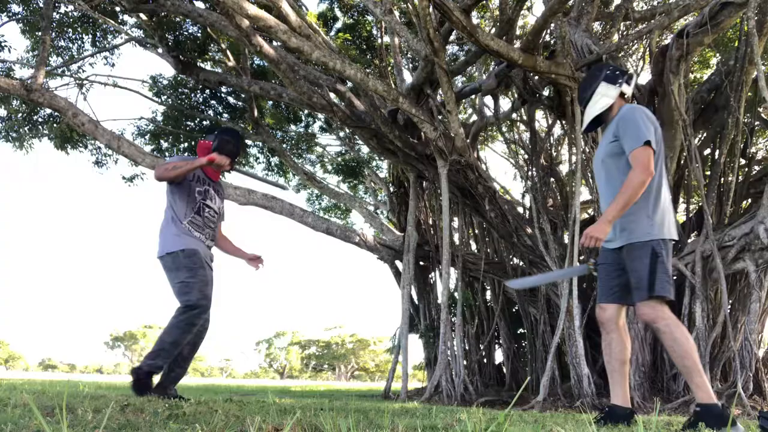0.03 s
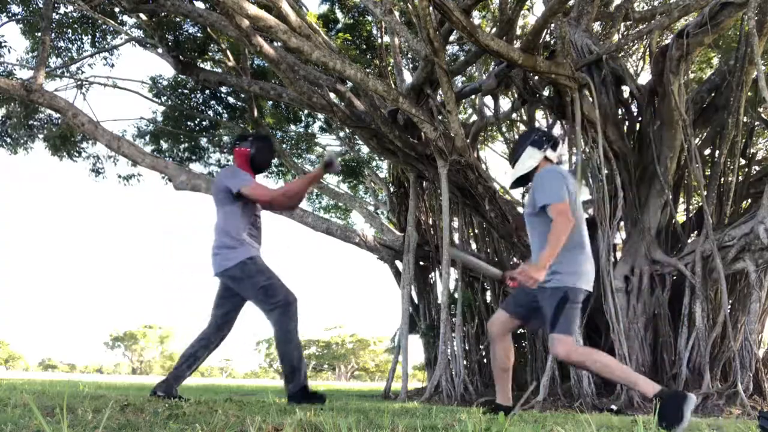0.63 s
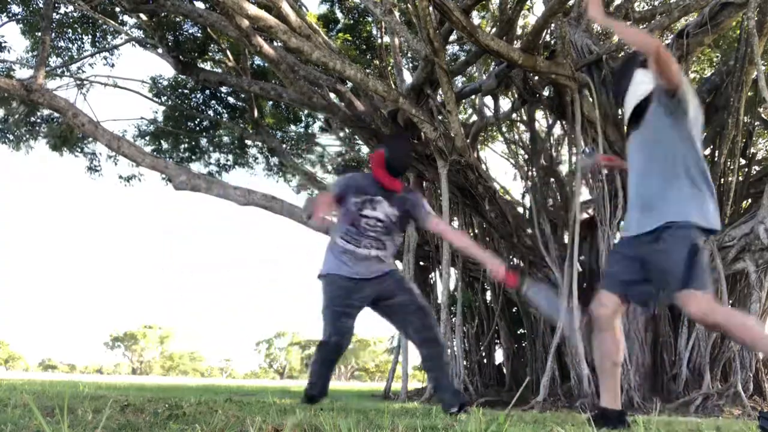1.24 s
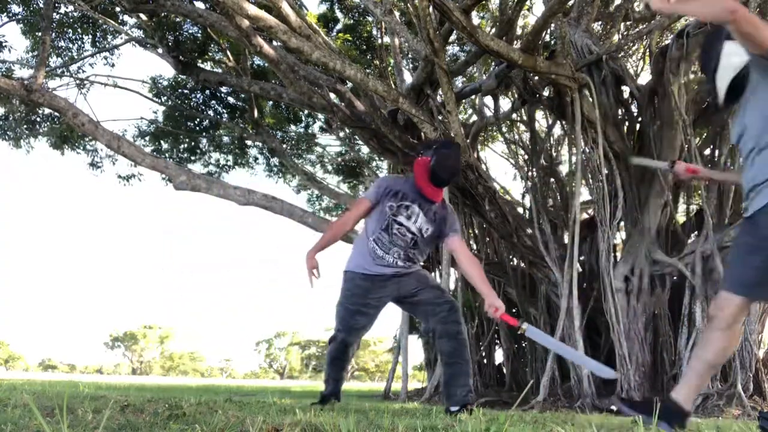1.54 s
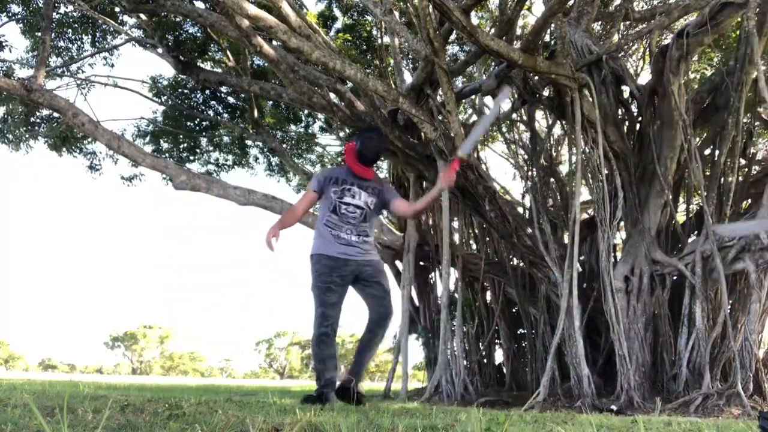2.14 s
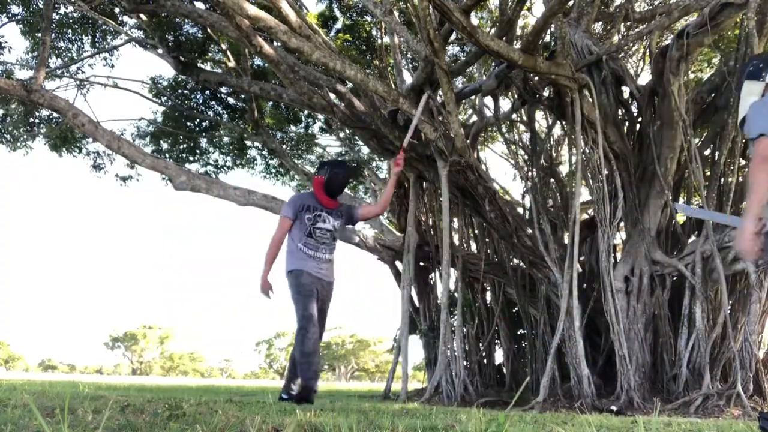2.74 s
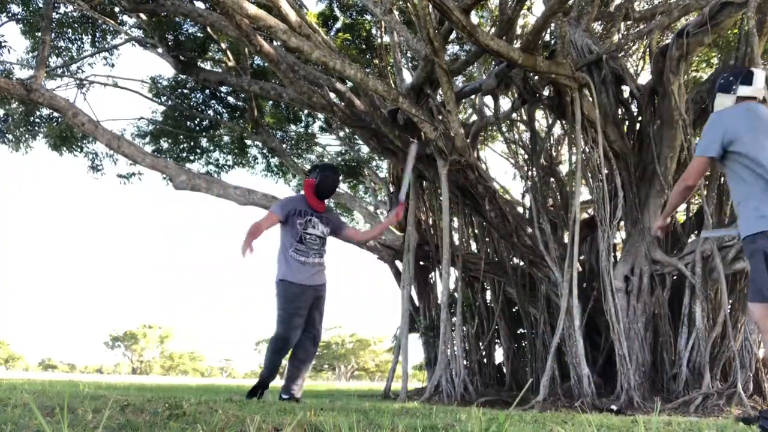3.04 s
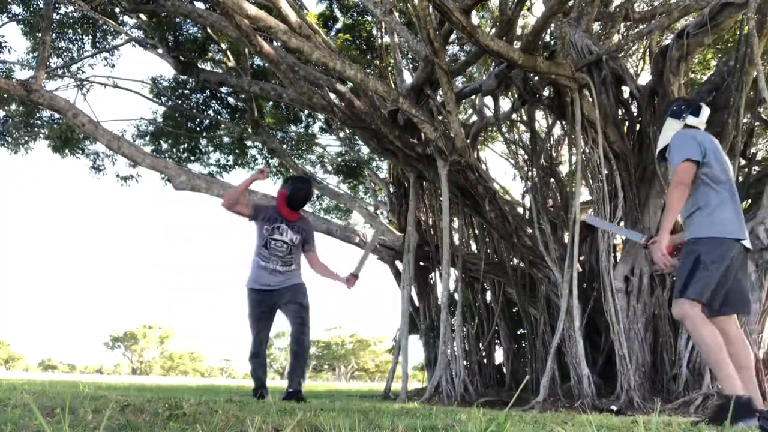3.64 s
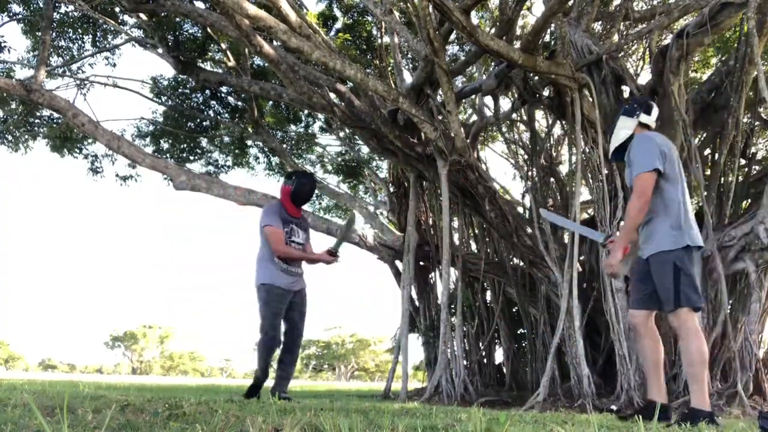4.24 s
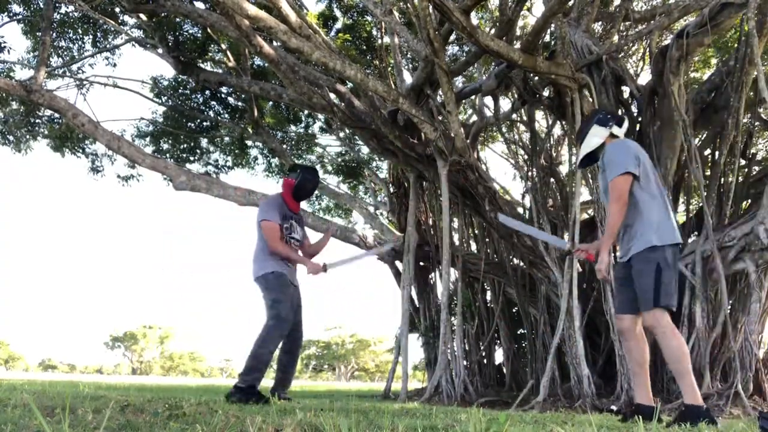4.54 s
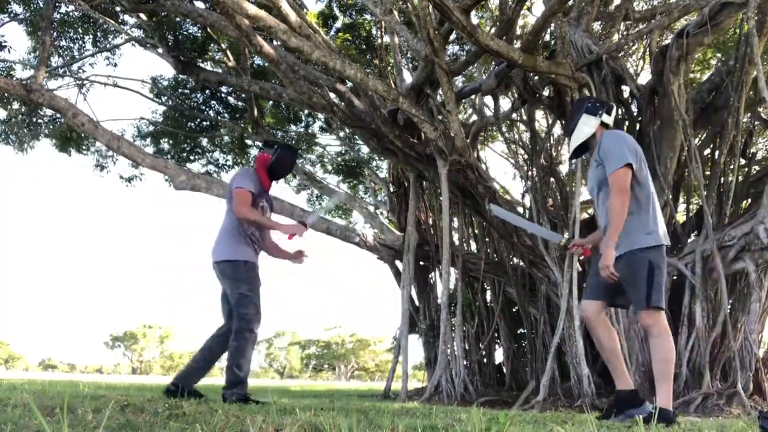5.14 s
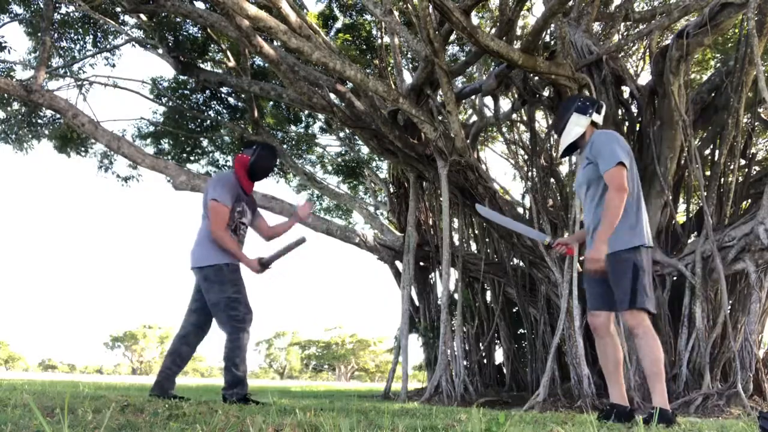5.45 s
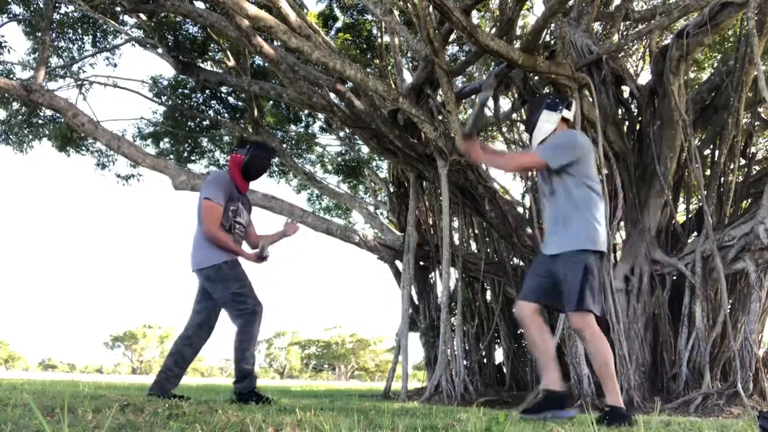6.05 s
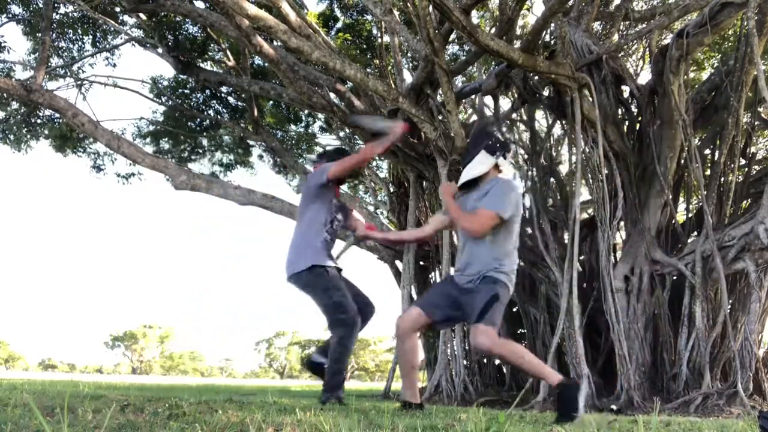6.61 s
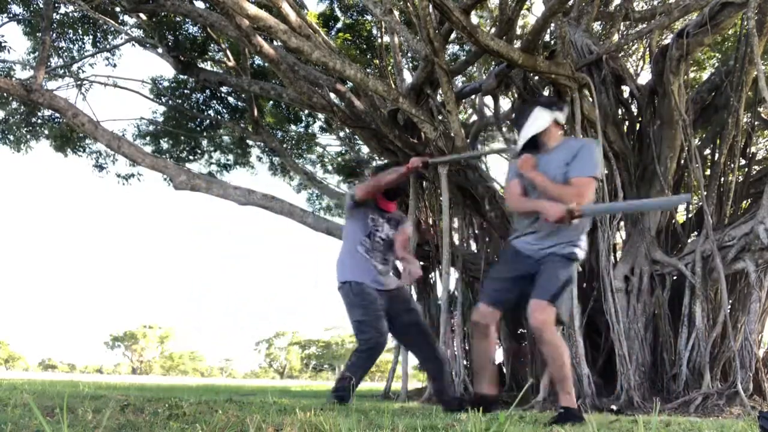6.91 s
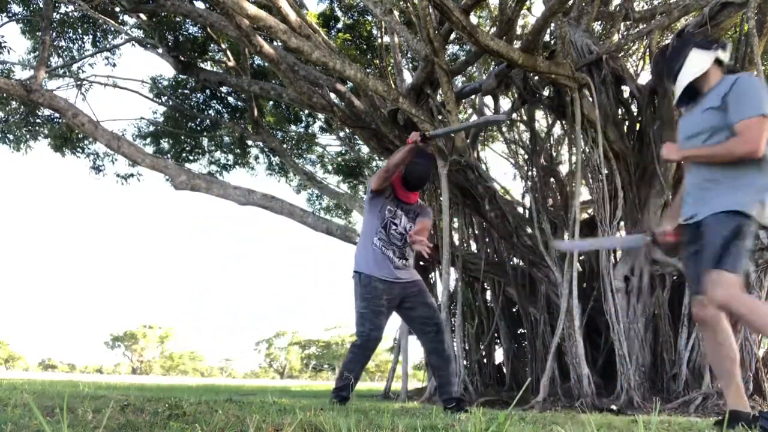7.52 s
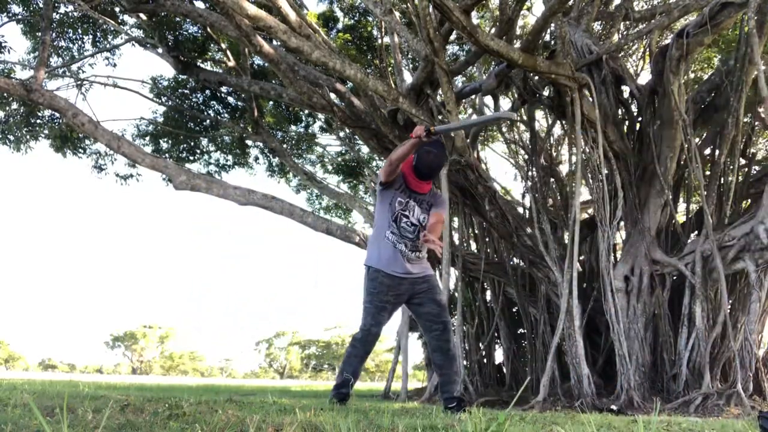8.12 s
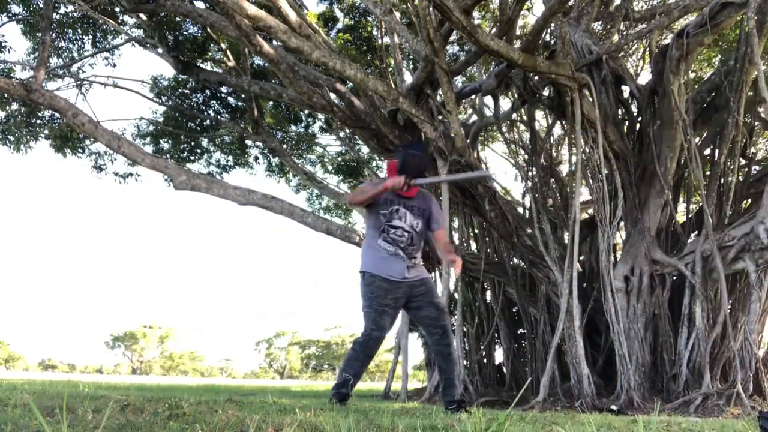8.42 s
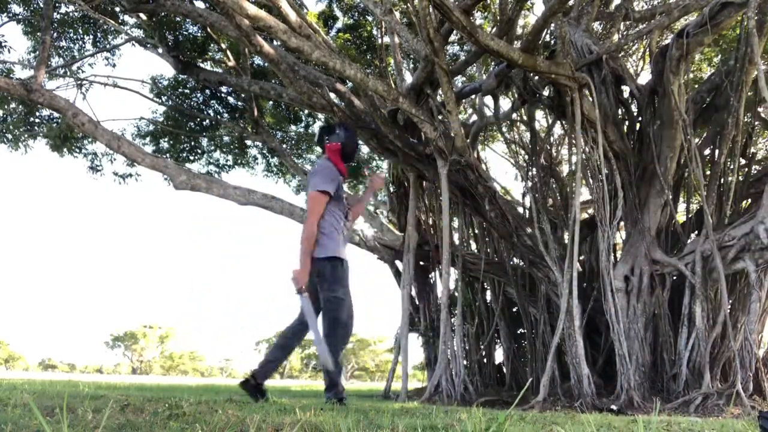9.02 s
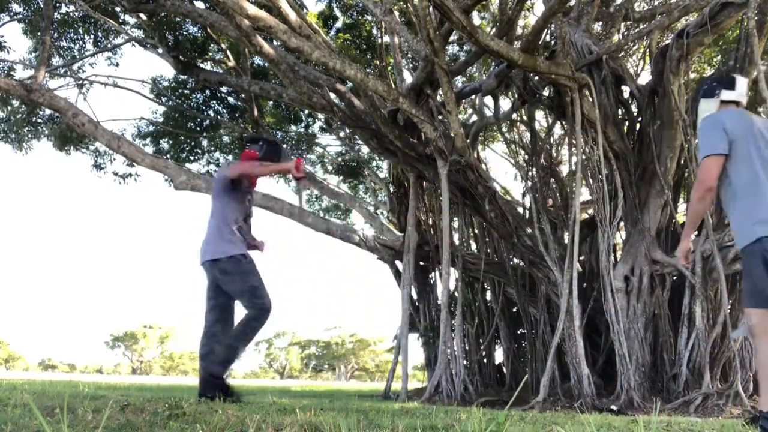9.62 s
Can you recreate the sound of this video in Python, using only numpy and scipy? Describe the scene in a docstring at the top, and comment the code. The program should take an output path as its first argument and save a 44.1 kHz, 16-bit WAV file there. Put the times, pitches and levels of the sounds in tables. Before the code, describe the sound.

Two people spar with plastic training swords on a lawn. A light click leads to one loud, sharp crack and then a brighter clack. For several seconds there is only wind rumbling on the microphone and soft steps in the grass. Then comes a quick flurry of clacks and duller knocks on padding, with a brief rasp of cloth. Far traffic hums faintly throughout.

```python
"""On a lawn in front of a huge many-trunked tree, two people spar with plastic training swords.
Each impact, blade on blade or on padding, excites damped bending modes; the lawn reflects the sound
and the trunks scatter it back. Friction makes the swish of grass, the scuff of soles and the rasp of
cloth. Turbulent wind buffets the microphone, and far traffic hums behind it all."""
import sys
import numpy as np
from scipy import signal
from scipy.fft import rfft, irfft, next_fast_len
from scipy.io import wavfile
from scipy.ndimage import uniform_filter1d

SR = 44100
rng = np.random.default_rng(int(sys.argv[2]) if len(sys.argv) > 2 else 0)


def materialize(psi):
    """Save the field psi as 16-bit PCM at rate SR to the path in sys.argv[1].

    A 1-D psi becomes a single channel; in a 2-D psi each row is a channel.
    """
    bounded = np.clip(np.atleast_2d(psi).T, -1, 1)
    quanta = np.round(bounded * 32767).astype(np.int16)
    wavfile.write(sys.argv[1], SR, quanta)


N = 430857
T = np.arange(N) / SR
START_S = 0.07   # silence before the sound begins


def from_db(db):
    """Amplitude ratio of a level in decibels."""
    return 10 ** (np.asarray(db) / 20)


def unit_rms(x):
    """Normalisation to unit rms."""
    return x / np.sqrt(np.mean(x ** 2) + 1e-20)


def in_time(rows, t=T):
    """Linear interpolation between rows of time and value."""
    return np.interp(t, *np.transpose(rows))


def swell(s, sigma_s, t=T):
    """Gaussian envelope of unit height, centred on time s."""
    return np.exp(-np.minimum(((t - s) / sigma_s) ** 2, 60) / 2)


def cut(x, hz, kind, order=2):
    """Butterworth low- or high-pass filter."""
    return signal.sosfilt(signal.butter(order, np.clip(hz, 10, .45 * SR), kind, fs=SR, output="sos"), x)


def resonance(x, hz, width_hz):
    """Damped resonator: a two-pole band-pass with unit peak gain."""
    r = np.exp(-np.pi * width_hz / SR)
    feedback = [1, -2 * r * np.cos(2 * np.pi * hz / SR), r * r]
    return signal.lfilter(np.array([1, 0, -1]) * (1 - r * r) / 2, feedback, x)


def drift(hz):
    """Random fluctuation of unit rms, low-passed at hz."""
    step, settle = 40, 2000
    r = np.exp(-2 * np.pi * step * hz / SR)
    slow = signal.lfilter([1], [1, -2 * r, r * r], rng.standard_normal(N // step + settle + 2))[settle:]
    return np.interp(np.arange(N) / step, np.arange(len(slow)), unit_rms(slow))


def noise(spectrum):
    """Unit-rms noise with the given spectral shape, falling steeply beyond its ends."""
    size = next_fast_len(N)
    hz, db = np.transpose(spectrum)
    f = np.maximum(np.fft.rfftfreq(size, 1 / SR), 1)
    gain = from_db(np.interp(np.log(f), np.log(hz), db))
    gain *= np.minimum(1, np.minimum(f / hz[0], hz[-1] / f)) ** 4
    return unit_rms(irfft(rfft(rng.standard_normal(size)) * gain, size)[:N])


def add(out, s, sound):
    """Superposition of a sound starting at time s."""
    at = max(round(s * SR), 0)
    out[at:at + len(sound)] += sound[:N - at]


# Wind strength at the microphone: t/s, level/dB
WIND_LEVEL = [(0.1, -45), (0.65, -43), (0.92, -35.5), (1.6, -41.5), (2.55, -45), (3.35, -40), (3.6, -43.0),
              (4.3, -41), (5.05, -44.5), (5.3, -38.5), (5.8, -36.5), (6.45, -44.0), (6.75, -41.5),
              (7.35, -47.0), (7.58, -37.5), (7.8, -41.5), (9.1, -43), (9.77, -40.5)]
# Spectrum of the wind rumble: f/Hz, relative density level/dB
RUMBLE_SPECTRUM = [(22, -28), (31, -17), (40, -8), (52, 1.5), (64, 3), (85, .5), (105, -1.5), (125, 1),
                   (160, -4.5), (240, -11), (330, -22.5), (480, -33)]


def wind(gust_db=4.5, gust_hz=7.6, rumble_db=-1.5, lumpy_db=2.0, churn_db=-20, churn_growth=0.77):
    """Turbulent pressure makes a lumpy rumble; a fainter, higher churn swells and fades with the gusts."""
    level_db = in_time(WIND_LEVEL) + gust_db * np.tanh(drift(gust_hz))
    rumble = noise(RUMBLE_SPECTRUM)
    rumble /= uniform_filter1d(rumble ** 2, size=3500) ** .5   # flatten the envelope
    rumble *= from_db(level_db + rumble_db + lumpy_db * drift(24.6))
    usual_db = np.median(level_db)
    churn = noise([(200, 8.5), (350, 0.0), (600, -12.5), (1000, -12.5)])
    churn *= from_db(usual_db + churn_db + churn_growth * (level_db - usual_db) + 3 * drift(14))
    return rumble + churn


# Spectrum of far traffic and leaves: f/Hz, relative density level/dB
TRAFFIC_SPECTRUM = [(250, -3), (400, -6), (600, -9.5), (800, -6.5), (1050, -4.5), (1400, -6), (1900, -11),
                    (2700, -19), (4000, -24), (7300, -28), (8700, -34.5), (10200, -33.5), (10900, -30),
                    (11800, -36), (15800, -42)]


def traffic(level_db=-54, waver_db=.8):
    """Incoherent sources sum to smooth noise: a far roar of tyres under a thin hiss of leaves."""
    return noise(TRAFFIC_SPECTRUM) * from_db(level_db + waver_db * drift(2.7))


# Strides through the grass: t/s, Gaussian half-width/s, level/dB
STRIDES = [(0.294, 0.054, -70), (1.027, 0.066, -59), (1.214, .043, -52.5), (2.144, 0.15, -58),
           (2.855, 0.085, -65.5), (3.05, 0.075, -65), (4.266, 0.077, -65), (4.95, 0.067, -69),
           (5.18, 0.17, -67.5), (6.05, .06, -73), (6.27, .085, -70.5), (6.472, 0.041, -60.5),
           (6.92, 0.065, -63), (7.138, 0.044, -58.5), (7.332, .062, -66), (7.593, .03, -66),
           (8.812, .14, -65), (9.49, 0.099, -61)]
# Spectrum of brushed grass: f/Hz, relative density level/dB
GRASS_SPECTRUM = [(1500, 3), (3000, -4), (5000, 1.5), (8000, 2), (10000, 1.5), (13000, -1.5), (15800, -4.5)]


def grass(grain_db=1.5, uneven_db=1.0, shuffle_db=-80, shuffle_swing_db=3.5):
    """Friction of shoes on grass makes a grainy hiss; strides and small shuffles add in power."""
    t = T[::100]
    stride_power = sum((from_db(db) * swell(s, sigma_s, t)) ** 2 for s, sigma_s, db in STRIDES)
    shuffle_power = from_db(shuffle_db + shuffle_swing_db * drift(3.9)) ** 2
    envelope = np.sqrt(np.interp(T, t, stride_power) + shuffle_power)
    return noise(GRASS_SPECTRUM) * envelope * from_db(grain_db * drift(250) + uneven_db * drift(25))


def weak_eddies(count=60, per_s=3.5, over_wind_db=3, usual_hz=144.8, spread_db=2, spread_octaves=.3):
    """A random point process of eddies that grow with the wind; returns t/s, peak level/dB, f/Hz."""
    chance = rng.standard_normal((count, 2))
    times = START_S + np.cumsum(rng.gamma(2, .5, count)) / per_s
    return [(s, in_time(WIND_LEVEL, s) + over_wind_db + spread_db * a,
             usual_hz * 2 ** (spread_octaves * b)) for s, (a, b) in zip(times, chance) if s < T[-1]]


# The strongest eddies to strike the microphone: t/s, peak level/dB, f/Hz
STRONG_EDDIES = [(0.385, -34.5, 168), (0.777, -26, 150), (0.913, -25, 230.6), (0.936, -25, 109),
                 (1.263, -31.5, 189.4), (3.081, -28, 140), (4.085, -32.5, 151.3), (4.412, -32, 169.5),
                 (4.477, -29.5, 129.7), (4.744, -30, 117), (5.288, -27.5, 101), (5.391, -28, 128.6),
                 (5.517, -30, 189), (5.581, -26, 117), (5.841, -24, 169), (5.885, -25, 136),
                 (6.081, -31, 139.7), (6.168, -29, 89.4)]


def eddies(sigma_s=.0095, sweep=0.215, ragged=0.25):
    """Convection of an eddy past the microphone gives a few pressure swings of falling frequency."""
    out = np.zeros(N)
    u = np.arange(-3 * sigma_s, 3 * sigma_s, 1 / SR) / sigma_s
    wobble = unit_rms(cut(rng.standard_normal(N + SR), 217, "low"))
    for s, db, hz in STRONG_EDDIES + weak_eddies():
        glide_hz = hz * np.exp(-sweep * u + ragged * wobble[int(s * SR):][:len(u)])
        phase = 2 * np.pi * np.cumsum(glide_hz) / SR
        add(out, s - 3 * sigma_s, from_db(db) * np.exp(-u * u / 2) * np.sin(phase))
    return cut(out, 45, "high")


def disperse(x, travel_s):
    """Dispersion: bending-wave speed grows as the root of frequency, so a click becomes a falling chirp."""
    hz = np.fft.rfftfreq(len(x), 1 / SR)
    return irfft(rfft(x) * np.exp(-4j * np.pi * travel_s * np.sqrt(1000 * hz)), len(x))


# Modes of a blade, heavily damped by the hand: f/Hz, bandwidth/Hz, relative level/dB
BLADE_MODES = [(338, 182, 20), (500, 135, -1.5), (1130, 510, 0.5), (1810, 160, -2.5), (2520, 840, -9.5),
               (4280, 1670, -1), (7330, 1600, 2.5), (10600, 1100, -25), (12800, 3000, -0.5)]
# Sword blows: t/s, strength/dB, upper cutoff f/Hz (low on padding), lower cutoff f/Hz (high if glancing),
# travel time at 1 kHz/s, f/Hz favoured by the contact point, its gain/dB, gain towards the tree/dB
BLOWS = [(0.693, -20, 4260, 740, 0.00041, 1420, 15.5, -12), (1.0602, -32, 5000, 2800, 0.00042, 3800, 8, 0),
         (1.1868, 9, 6440, 348, 0.0016, 1150, -3.5, -1), (1.1907, -13, 10000, 2000, .0012, 2500, 14, 3),
         (1.9056, -7.5, 17000, 2400, 0.00048, 2200, 5.5, -3),
         (1.9060, -7.5, 11000, 6200, 0.00057, 9600, 4.5, -2), (6.2201, -26, 8000, 900, .0012, 1400, 3, 7),
         (6.5769, -25.5, 7500, 2700, .0012, 2720, 21.5, -6),
         (6.5858, -18, 14500, 1900, 0.00058, 2380, 6, -6), (6.632, -12.5, 2720, 200, 0.0035, 2900, -14, -8),
         (6.7144, -21, 7460, 240, 0.0016, 2680, 16.5, 6), (6.7184, -1.5, 2600, 228, 0.00068, 369, -5, 4.5),
         (6.7604, -12, 1550, 130, 0.0012, 900, 9, -3), (8.0950, -34, 7500, 400, 0.0024, 760, 11, -2)]


def swords(size=4096, relative_width=.22, chatter_db=-19, chatter_s=0.0056):
    """Impact excites the blade's modes; returns the direct sound and the sound sent towards the tree."""
    direct, outward = np.zeros(N), np.zeros(N)
    t = np.arange(size) / SR
    for s, db, top_hz, low_hz, travel_s, ring_hz, ring_db, tree_db in BLOWS:
        chatter = rng.standard_normal(size) * np.exp(-t / chatter_s)   # the surfaces grate briefly
        force = signal.unit_impulse(size) + from_db(chatter_db) * chatter / np.linalg.norm(chatter)
        ring = sum(from_db(mode_db) * resonance(force, hz, width) for hz, width, mode_db in BLADE_MODES)
        ring += from_db(ring_db) * resonance(ring, ring_hz, relative_width * ring_hz)
        ring = cut(ring, top_hz, "low", order=3)
        ring = cut(ring, low_hz, "high")
        blow = 2 * from_db(db) * disperse(ring, travel_s)
        add(direct, s, blow)
        add(outward, s, from_db(tree_db) * blow)
    return direct, outward


def ground_bounce(x, delay_s=0.000564, bounce_db=-13, top_hz=3000):
    """Ground reflection: a dull copy off the lawn reaches the low microphone just after the direct wave."""
    reflected = np.interp(T - delay_s, T, cut(x, top_hz, "low", order=1))
    return x + from_db(bounce_db) * reflected


# Envelope of the echoes from the trunks: t/s after the blow, relative level/dB
ECHO_ENVELOPE = [(0, -18), (.008, -5), (.015, -6.5), (.023, 2.5), (.034, -2), (.05, -15), (.09, -26),
                 (.16, -23), (.3, -54)]


def tree(x, gain_db=-13.5, low_hz=496, top_hz=4160):
    """Scattering: hundreds of trunks and hanging roots each return a small, dull echo."""
    t = np.arange(SR // 3) / SR
    echoes = rng.standard_normal(len(t)) * from_db(in_time(ECHO_ENVELOPE, t))
    echoes = cut(echoes / np.linalg.norm(echoes), top_hz, "low", order=1)
    echoes = cut(echoes, low_hz, "high", order=1)   # long waves diffract round the trunks
    return from_db(gain_db) * signal.fftconvolve(x, echoes)[:N]


# Skids of a sole: t/s, rms level at the crest/dB, Gaussian half-width/s
SCUFFS = [(0.772, -42.5, 0.0035), (2.1, -52.5, 0.036), (2.219, -48, 0.0073), (5.278, -48, 0.017),
          (6.461, -44.5, 0.015)]


def scuffs(hz=468, width_hz=400):
    """Sliding friction of a sole on turf gives a short, dull burst of band-limited noise."""
    turf = resonance(rng.standard_normal(N), hz, width_hz)
    turf = unit_rms(resonance(turf, hz, width_hz))
    return turf * sum(from_db(db) * swell(s, sigma_s) for s, db, sigma_s in SCUFFS)


# A distant engine, then a bird: start t/s, end t/s, f/Hz, level/dB
FAR_TONES = [(2.3, 3.9, 350, -57.5), (8.106, 8.29, 1516, -55)]


def engine_and_bird(waver_db=2.8, pitch_waver=0.0106):
    """Random amplitude and frequency modulation make each faint tone waver as it swells and fades."""
    out = np.zeros(N)
    for start, end, hz, db in FAR_TONES:
        progress = np.clip((T - start) / (end - start), 0, 1)
        envelope = from_db(db + waver_db * drift(4.9)) * np.sqrt(np.abs(np.sin(np.pi * progress)))
        pitch_hz = hz * (1 + pitch_waver * drift(15.6))
        out += envelope * np.sin(2 * np.pi * np.cumsum(pitch_hz) / SR)
    return out


# Modes of something hard, perhaps a mask: f/Hz, bandwidth/Hz, relative level/dB
TAP_MODES = [(2790, 86, -4), (3600, 95, -6), (5280, 120, 0.5), (8150, 93, -8)]


def tip_tap(s=6.2215, gain_db=-5):
    """Free vibration: a light touch of a blade tip leaves a few clear modes ringing briefly."""
    out, touch = np.zeros(N), signal.unit_impulse(SR // 10)
    add(out, s, sum(from_db(gain_db + db) * resonance(touch, hz, width) for hz, width, db in TAP_MODES))
    return out


# Blades and sleeves rubbing in the clinch: t/s, level/dB, 60 dB decay time/s (0 is silent)
RUBS = [(6.595, -50, 0.5), (6.634, -60, 0), (6.729, -46, 0.36), (6.79, -55, 0.9)]
# Spectrum of rasping cloth: f/Hz, relative density level/dB
CLOTH_SPECTRUM = [(900, -1), (2000, 2), (4000, -3.5), (6500, -4), (9000, -10.5), (15000, -18)]


def rubbing(attack_s=0.0051, grain_db=2.5):
    """Friction of plastic on cloth and padding gives an uneven rasp that decays exponentially."""
    power = np.zeros(N)
    for s, db, t60 in RUBS:
        if t60 > 0:
            attack = np.clip((T - s) / attack_s, 0, 1)
            decay_db = 60 * np.clip((T - s) / t60, 0, 2)
            power += (attack * from_db(db - decay_db)) ** 2
    return noise(CLOTH_SPECTRUM) * np.sqrt(power) * from_db(grain_db * drift(200))


def blade_slide(s=6.652, sigma_s=0.019, level_db=-47.5, low_hz=7000, top_hz=14000):
    """Sliding friction gives a short, bright hiss as one blade skims off the other."""
    hiss = cut(rng.standard_normal(N), low_hz, "high")
    hiss = unit_rms(cut(hiss, top_hz, "low"))
    return from_db(level_db) * hiss * swell(s, sigma_s)


def scene():
    """Superposition of the fight, its echoes, the wind and the distant sources in one channel."""
    blows, outward = swords()
    tap = tip_tap()
    impacts = ground_bounce(blows + tap) + tree(outward + tap)
    friction = rubbing() + blade_slide() + grass() + scuffs()
    return (impacts + friction + wind() + traffic() + engine_and_bird() + eddies())[None]


def record(dry, fade_s=.004, cutoff_hz=15900):
    """Clipping and band limiting: the signal fades in, is held within full scale and is low-passed."""
    fade_in = np.clip((T - START_S) / fade_s, 0, 1)
    low_pass = signal.ellip(10, .1, 80, cutoff_hz, fs=SR, output="sos")
    return signal.sosfilt(low_pass, np.clip(dry * fade_in, -1, 1))


dry = scene()
out = record(dry)
materialize(out)
```